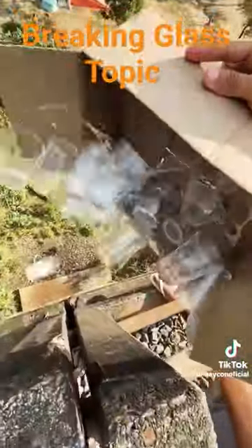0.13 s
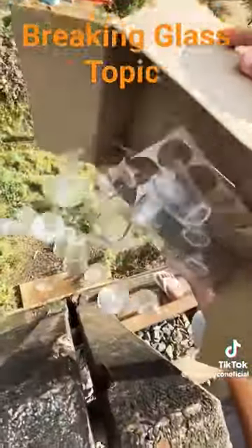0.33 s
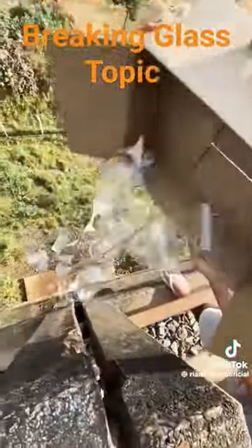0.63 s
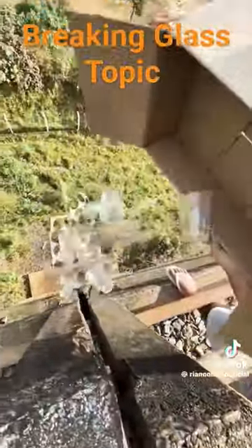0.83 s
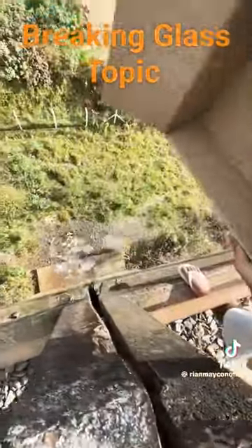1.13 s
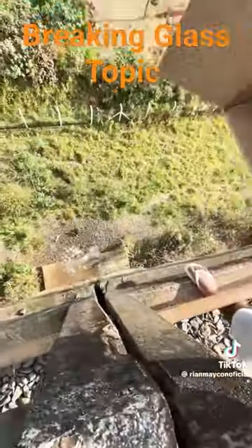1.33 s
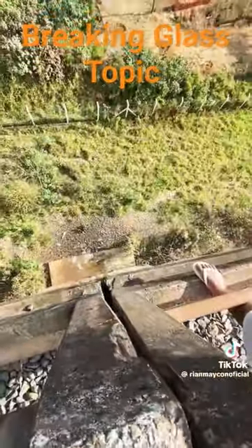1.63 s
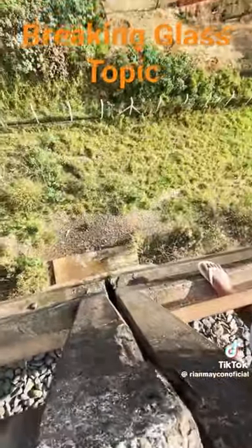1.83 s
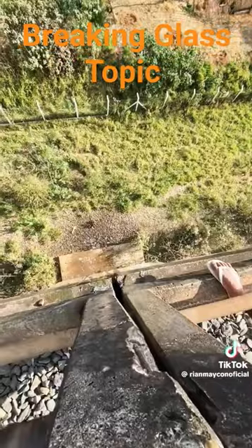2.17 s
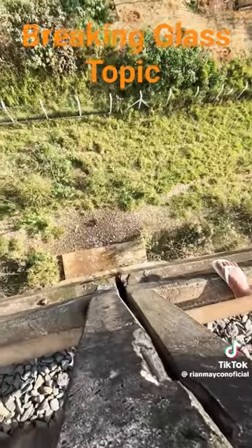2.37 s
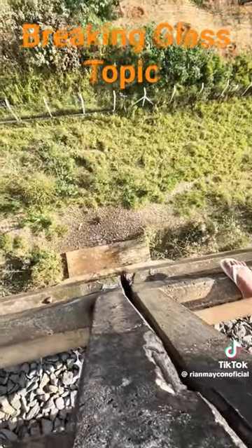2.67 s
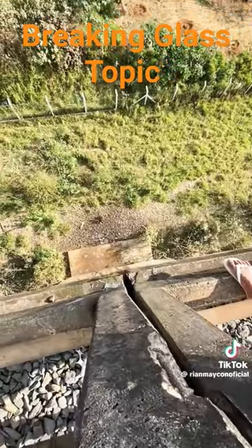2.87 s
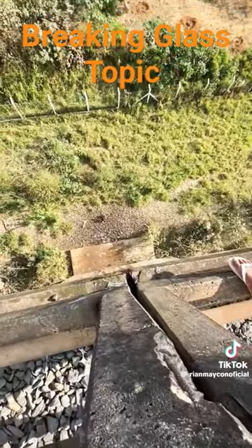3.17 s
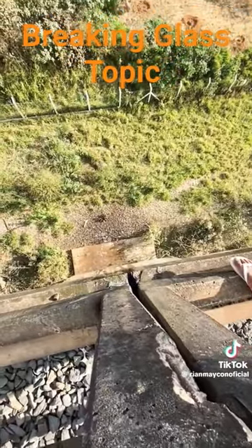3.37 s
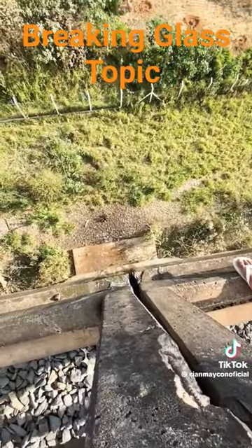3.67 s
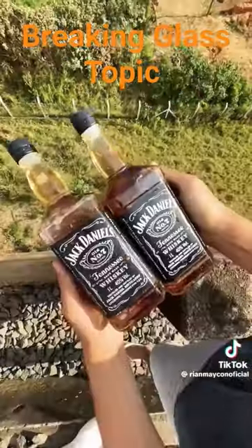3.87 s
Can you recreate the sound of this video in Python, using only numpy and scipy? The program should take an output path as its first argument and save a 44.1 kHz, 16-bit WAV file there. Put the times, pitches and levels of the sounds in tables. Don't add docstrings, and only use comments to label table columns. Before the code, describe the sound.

Glass cups knock, rattle and scrape in dense lurches as they slide from a box close by, thinning after 0.6 s to single clinks and hollow pops. From 0.8 and 1.2 s, two spinning cups ring with a wavering high tone. At about 1.9-3.1 s they smash below in crisp snaps, then sparse shards tinkle until 4 s. Low outdoor wind buffets the phone microphone.

```python
import sys
import numpy as np
from scipy import signal
from scipy.fft import rfft, irfft, next_fast_len
from scipy.io import wavfile
from scipy.ndimage import uniform_filter1d

SR = 44100
rng = np.random.default_rng(int(sys.argv[2]) if len(sys.argv) > 2 else 0)


def convert_level_to_amplitude(level_db):
    exponent = np.asarray(level_db, float) / 20
    return 10 ** exponent


def digitize_waveform(pressure):
    field = np.atleast_2d(pressure).T
    bounded = np.clip(field, -1, 1)
    quanta = np.round(bounded * 32767).astype(np.int16)
    wavfile.write(sys.argv[1], SR, quanta)


N = 176400

# freq_hz, level_db (per Hz)
GRIT = [(350, -44), (600, -28.5), (960, -2), (1640, -14.5), (1790, -7), (2110, -8), (8870, -13.5),
        (12500, -24), (16200, -69), (22000, -120)]
POP_HZ, POP_T60 = 935.6, 0.04
SNAP_LEAD = 0.004


def evened(x):
    return x / np.sqrt(np.mean(x ** 2) + 1e-20)


def curve(points):
    s, db = np.transpose(points)
    before = -130 if s[0] > .1 else db[0]
    after = -130 if s[-1] < 3.5 else db[-1]
    level_db = np.interp(np.arange(N) / SR, s, db, left=before, right=after)
    return convert_level_to_amplitude(uniform_filter1d(level_db, size=200))


def colour(x, points, lead=None):
    size = next_fast_len(x.shape[-1] + 4096)
    hz = np.fft.rfftfreq(size, 1 / SR)
    f, db = np.transpose(points)
    turn = 1 if lead is None else np.exp(1j * np.interp(hz, *np.transpose(lead)))
    gain = convert_level_to_amplitude(np.interp(np.log(hz + 1), np.log(f + 1), db))
    return irfft(rfft(x, size) * gain * turn, size)[..., :x.shape[-1]]


def add(mix, s, sound):
    part = mix[round(s * SR):][:len(sound)]
    part += sound[:len(part)]


def ring(hz, db, t60, length=.5):
    t = np.arange(int(length * SR)) / SR
    return convert_level_to_amplitude(db - 60 * t / t60) * np.minimum(t / 0.00081, 1) * np.sin(2 * np.pi * hz * t)


def taps(per_s, range_db):
    chance = rng.random(N)
    size = rng.exponential(1, N)
    sign = np.where(chance < per_s / SR / 2, 1, -1)
    return convert_level_to_amplitude(range_db * np.minimum(size, 4)) * (chance < per_s / SR) * sign


def patter(per_s, range_db, t60):
    grain = convert_level_to_amplitude(-60 * np.arange(2048) / SR / t60) ** 2
    power = abs(signal.oaconvolve(taps(per_s, range_db) ** 2, grain)[:N])
    return np.sqrt(power) * rng.standard_normal(N)


def crack(db, tilt_db=0):
    # freq_hz, level_db (per Hz)
    snap_spectrum = [(240, -43.5), (400, -30.5), (942, -10.5), (2220, -5.5), (2670, -6), (3740, -2),
                     (6380, -11), (8400, -6.5), (15500, -15)]
    t60 = 0.0061
    t = np.arange(2048) / SR - SNAP_LEAD
    burst = (t > 0) * convert_level_to_amplitude(-60 * t / t60) * rng.standard_normal(len(t))
    click = 2.2 * (abs(t - .0004) < .5 / SR)
    tilted = [(f, g + 2 * tilt_db * max(np.log2(f / 2500), 0)) for f, g in snap_spectrum]
    snap = colour(burst + click, tilted)
    return convert_level_to_amplitude(db) * snap / abs(snap).max()


def cup():
    # pitch_hz, level_db, t60_s
    modes = [(1775, -14, 0.17), (2695, -10.5, .025), (4589, -3.5, 0.12), (5340, -16, .025),
             (7950, -32.5, 0.05), (7990, -11, 0.05), (8355, -2.5, 0.038), (9270, -18.5, 0.055),
             (11600, -16.5, 0.082), (13400, -31.5, .04)]
    spread = .0095
    out = 0
    for hz, db, t60 in modes:
        detune, strike = rng.standard_normal(2)
        out = out + ring(hz * (1 + spread * detune * np.sqrt(hz / 4500)), db + 5 * strike, t60)
    return out


def pour():
    # start_s, level_db
    heap = [
        (0, -21),
        (.2, -25.5),
        (.45, -29),
        (.55, -35.5),
        (.65, -32.5),
        (.8, -31),
        (.86, -52.5),
        (1.15, -61.5),
        (1.25, -72.5),
    ]
    # start_s, level_db, length_s
    lurches = [(0.001, -18.5, 0.0027), (0.037, -12, 0.0072), (0.057, -12.5, 0.0049), (0.122, -10.5, 0.013),
               (0.155, -12.5, 0.013), (0.2277, -15.5, 0.012), (0.2988, -13, 0.0065), (0.318, -24, 0.0047),
               (0.339, -10, 0.0071), (0.4, -11.5, 0.0094), (0.421, -1.5, 0.0021), (0.425, -14, 0.012),
               (0.495, -22, 0.004), (0.5336, -24.5, 0.007), (0.559, -23, 0.015), (0.604, -10.5, 0.011),
               (0.704, -17.5, 0.013)]
    # start_s, crack_db, ring_db (re crack), hollow_pop_db (re crack)
    clinks = [(0.6025, -28.5, -33, -30), (0.688, -21.5, -23, -20), (0.7503, -9.5, -50, -12),
              (0.7887, -13.5, -38, 1), (0.8074, -25, -41, 5.5), (0.9484, -36.5, -8, -7),
              (1.007, -39.5, -9, -20), (1.051, -10, -51, -8.5), (1.14, -46.5, -38, -20),
              (1.1881, -9, -15, -14.5), (1.275, -42, -38, -16), (1.3277, -56, -3, -33.5),
              (1.4624, -55, -15.5, -23), (1.505, -57, -10.5, -31), (1.6086, -59, -26.5, -28)]
    # freq_hz, level_db
    scrape_spectrum = [(110, -39), (350, -1.5), (1200, -10), (6000, -6.5), (14000, -40)]
    taps_per_s, rattle_db, scrape_db = 600, 2, -10.5
    lurch_db, lurch_crack_db, lurch_scrape_db = -13, -1.5, -2

    t = np.arange(N) / SR
    lurch = np.zeros(N)
    for s, db, length in lurches:
        lurch += convert_level_to_amplitude(db + lurch_db) * (t > s) * np.exp(-(abs(t - s) / length) ** 2 / 2)
    level = curve(heap) + lurch

    cups = [cup() for _ in range(16)]
    rattle = np.zeros(N)
    lead_in = SR // 10
    for body in cups:
        knocks = taps(taps_per_s / len(cups), 1.5)
        blows = np.r_[knocks[-lead_in:] * level[0], knocks * level]
        rattle += signal.oaconvolve(blows, body)[lead_in:][:N]
    scrape = evened(colour(patter(900, 3., 0.02), scrape_spectrum))
    out = convert_level_to_amplitude(rattle_db) * rattle / 2
    out += convert_level_to_amplitude(scrape_db) * (level + convert_level_to_amplitude(lurch_scrape_db) * lurch) * scrape

    for s, db, _ in lurches:
        add(out, s - SNAP_LEAD, crack(db + lurch_crack_db))
    for k, (s, db, ring_db, pop_db) in enumerate(clinks):
        add(out, s - SNAP_LEAD, crack(db + 3.5, tilt_db=-2.5))
        pair = cups[k] + cups[-k - 1]
        add(out, s, convert_level_to_amplitude(db + ring_db) * pair + ring(POP_HZ, db + pop_db, POP_T60))
    return out


def spinners():
    # start_s, level_db, swells_per_s, start_turn (0-1), t60_s
    spins = [
        (0.806, -22.5, 19.5, 0.65, 1.29),
        (1.19, -21.5, 12.8, 0.11, 1.31),
        (2.827, -33.5, 24.4, 0.6, 1.26),
        (3.088, -48, 1.23, 0.84, 2.3),
        (3.74, -56, 2.18, 0.85, 2.7),
    ]
    # pitch_ratio, level_db, t60_share
    modes = [(1, 0, 0.68), (2.0, -29, 0.48), (2.54, -15.5, 0.46), (2.572, -6.5, 0.21), (2.59, -17, 0.14),
             (4.5, -24, .25), (4.6, -20, 0.3), (4.72, -32, .25)]
    pitch_hz, sag_per_s = 1779, 0.019
    out = np.zeros(N)
    t = np.arange(SR) / SR
    for s, db, swells, turn, t60 in spins:
        for k, (ratio, mode_db, share) in enumerate(modes):
            depth = 0.71 * (k != 1)
            angle = swells * t * (1 + 0.18 * k) + turn + 0.24 * k
            lobes = 1 - depth + depth * np.cos(2 * np.pi * angle)
            tone = np.sin(2 * np.pi * pitch_hz * ratio * (t - sag_per_s * t ** 2))
            decay = convert_level_to_amplitude(db + mode_db - 60 * t / (t60 * share))
            add(out, s, decay * np.minimum(t / 0.006, 1) * lobes * tone)
    return out


def splinters(grit):
    # start_s, level_db
    rain = [(1.87, -86), (1.97, -64), (2.14, -67.5), (2.22, -55), (2.33, -49.5), (2.45, -59.5),
            (2.62, -63.5), (2.7, -65), (2.76, -54), (2.9, -54.5), (3.05, -57), (3.15, -54.5), (3.3, -64),
            (3.55, -63), (3.7, -69), (4, -77)]
    bits_per_s, bits_db, bit_t60, grit_db = 300, -6, .06, -.5
    bits = np.zeros(N)
    for a, b, c, d in rng.random((int(2 * bits_per_s), 4)):
        pitch_hz = 2800 + 8400 * b
        bit = ring(pitch_hz, 8 * a + 12 * c ** 2, bit_t60 * (.4 + 3 * d ** 2), .15)
        add(bits, 1.9 + 2.1 * a, bit)
    bits /= np.sqrt(uniform_filter1d(bits ** 2, size=30000) + 1)
    rise = convert_level_to_amplitude(4 * np.arange(N) / SR - 1)
    return curve(rain) * (convert_level_to_amplitude(bits_db) * bits * rise + convert_level_to_amplitude(grit_db) * evened(grit))


def ground():
    # start_s, crack_db, hollow_pop_db (re crack), tilt_db (per half octave)
    smashes = [(1.893, -45, -3, -1.5), (1.949, -64, -17, 8), (1.974, -20.5, -26, -6.5),
               (2.061, -39.5, -9, -4.), (2.167, -27, -33.5, 0), (2.213, -25, -5, -3),
               (2.222, -15, -12.5, -1.5), (2.23, -29, -17, 1.5), (2.241, -24.5, -1.5, -1),
               (2.259, -29.5, -16, -3.5), (2.276, -13.5, -11, 2.5), (2.282, -31, -28, -1.5),
               (2.361, -18, -25, -3), (2.373, -15.5, -14, -3), (2.45, -43, -4, -8.5), (2.46, -36, -8, 1.5),
               (2.467, -35, -25, 0), (2.558, -27, -13, -1.), (2.666, -17, -13.5, -2.),
               (2.673, -26.5, -6.5, 5), (2.684, -18.5, -35, -7), (2.752, -47.5, -11, -4),
               (2.773, -23.5, -15, -0.5), (2.803, -29.5, -11, 0.5), (2.817, -33.5, -36, 1),
               (2.824, -19.5, -6, 0.5), (2.879, -35, -19, -0.5), (2.887, -23.5, -40, 1),
               (2.92, -16, -40, -2.), (2.942, -20, -12, 0.), (2.95, -27.5, -13, 4.5),
               (3.053, -40, -15, -1.5), (3.08, -33, -23, 6), (3.108, -51, -23, 2), (3.156, -33, -36, 0.5),
               (3.732, -43, -37, -1), (3.8513, -36.5, -42.5, 1)]
    # start_s, level_db, pitch_hz, t60_s
    chimes = [(0.749, -21.5, 6870, 0.1), (0.805, -28.5, 7060, .15), (2.279, -30.5, 8000, 0.099),
              (2.819, -19.5, 8010, 0.03), (2.89, -26.5, 6200, 0.069), (2.953, -33.5, 8420, 0.05),
              (3.1073, -16.5, 5600, 0.022), (3.125, -33.5, 5890, 0.091), (3.1554, -29, 8660, 0.18),
              (3.205, -37, 11300, 0.05), (3.298, -36, 5600, 0.027), (3.357, -41, 4240, 0.14),
              (3.4139, -36.5, 8320, 0.13), (3.421, -33.5, 10760, 0.092), (3.46, -36.5, 5700, 0.1),
              (3.492, -29.5, 9000, 0.085), (3.524, -46, 2980, 0.18), (3.54, -46, 6830, 0.045),
              (3.548, -42, 8840, 0.2), (3.6276, -40.5, 5830, 0.23), (3.7111, -40, 6810, 0.069),
              (3.7341, -28.5, 9470, 0.04), (3.7727, -34, 4550, 0.39), (3.806, -41.5, 9820, 0.069),
              (3.83, -44, 3820, 0.16), (3.8523, -39.5, 4500, 0.19), (3.868, -41, 5660, 0.053)]
    blow_hz, blow_t60, blow_db = 1446, 0.011, -4.5
    debris_db, debris_t60 = -28.5, 0.23
    grit = colour(patter(1500, 3.7, .02), GRIT)
    out = splinters(grit)

    spray_power = np.zeros(N)
    t = np.arange(SR // 4) / SR
    for s, db, *_ in smashes:
        add(spray_power, s, convert_level_to_amplitude(db + debris_db - 60 * t / debris_t60) ** 2)
    out += np.sqrt(spray_power) * evened(grit[::-1])

    for s, db, pop_db, tilt_db in smashes:
        a, b = rng.uniform(-0.35, 1, 2)
        add(out, s - SNAP_LEAD, crack(db + 3.5, tilt_db))
        add(out, s, ring(blow_hz * (1 + 0.45 * a), db + blow_db, blow_t60))
        add(out, s, ring(POP_HZ * (1 + 0.19 * b), db + pop_db, POP_T60))
    for s, db, hz, t60 in chimes:
        add(out, s - SNAP_LEAD, crack(db - 7.0))
        add(out, s, ring(hz, db - 8.5, t60))
    return out


def wind():
    # freq_hz, level_db (per Hz)
    low_spectrum = [(12, -46), (20, -14.5), (65, 6.5), (198, 2), (354, -5.5), (586, -23.5), (812, -18.5),
                    (1010, -32.5), (1500, -39), (1950, -43.5), (3300, -120)]
    # start_s, level_db
    gusts = [(0, -61.5), (.13, -62), (.4, -56), (1.05, -48), (1.3, -55.5), (1.6, -47), (1.72, -54),
             (1.85, -47), (2.0, -54.5), (2.17, -48), (2.45, -60.5), (2.6, -55.5), (2.8, -69.5),
             (3.05, -51.5), (3.28, -64.5), (3.55, -53), (3.95, -70), (4, -50.5)]
    lump_db, port_correlation, air_db = 6.5, -0.56, -82.5
    frames, hz = N // 128 + 5, np.fft.rfftfreq(512, 1 / SR)
    a, b, c, d, p = rng.standard_normal((frames, 257, 5)).T

    lumps = evened(uniform_filter1d(uniform_filter1d(p, size=5, axis=0), size=8, axis=1))
    flutter = evened(uniform_filter1d(p[200:240].mean(0), size=5))
    flutter = flutter * np.clip(np.log2(hz / 150 + .5), 0, 3)[:, None]
    first, other = a + 1j * b, c + 1j * d
    second = port_correlation * first + np.sqrt(1 - port_correlation ** 2) * other
    z = np.array([first, second]) * convert_level_to_amplitude(lump_db * lumps + 2.8 * flutter)
    buffet = signal.istft(z, nperseg=512, noverlap=384)[1][:, :N]

    gust = curve(gusts)
    low = evened(colour(buffet, low_spectrum + [(3000, -68.0)]))
    high = evened(colour(buffet, [(250, -46.5), (500, 7.5), (1300, -17), (2500, -54.5)]))
    air = evened(colour(rng.standard_normal((2, N)), GRIT))
    return convert_level_to_amplitude(5.0) * gust * low + convert_level_to_amplitude(-9.5) * gust ** 2 / gust.max() * high + convert_level_to_amplitude(air_db) * air


def reflections(glass):
    t = np.arange(3000) / SR
    hits = (rng.random((2, 3000)) < .03) * rng.standard_normal((2, 3000))
    echo = hits * convert_level_to_amplitude(-60 * t / 0.018) * (t > .002)
    echo /= np.linalg.norm(echo, axis=1, keepdims=True)
    return signal.oaconvolve(glass[None], echo, axes=1)[:, :N]


def scene():
    # freq_hz, balance_db
    balance = [(60, 0.5), (180, 3.5), (550, 5.5), (1650, 0), (4970, -8.5), (11000, 3)]
    # freq_hz, phase_rad
    port_lead = [(0, 0), (600, -2.5), (1290, -0.4), (2580, 1.4), (4390, 1.5), (5510, 7.0), (7490, 6.3),
                 (7750, 7.6), (10900, 9.2), (15200, 9.5)]
    glass = pour() + spinners() + ground()
    ports = []
    for side in (.5, -.5):
        gains = [(f, side * db) for f, db in balance]
        phases = [(f, side * r) for f, r in port_lead]
        ports.append(colour(glass, gains, phases))
    return convert_level_to_amplitude(-2.5) * np.array(ports) + convert_level_to_amplitude(-11) * reflections(glass) + wind()


def roll_off(x):
    return signal.sosfilt(signal.butter(12, 15660, fs=SR, output="sos"), x)


def record(dry):
    # freq_hz, gain_db
    response = [(9300, 1), (10300, 6.5), (12300, 2.5), (16000, -16.5)]
    return roll_off(colour(dry, response))


dry = scene()
out = record(dry)
digitize_waveform(out)
```